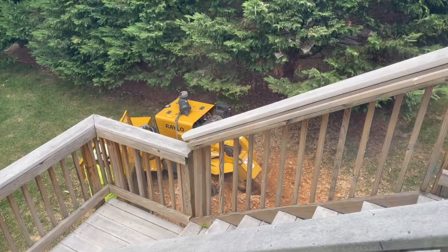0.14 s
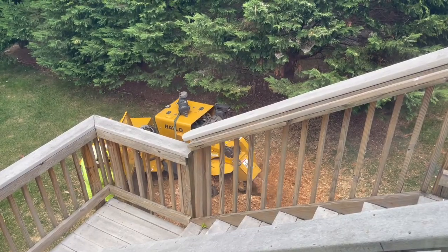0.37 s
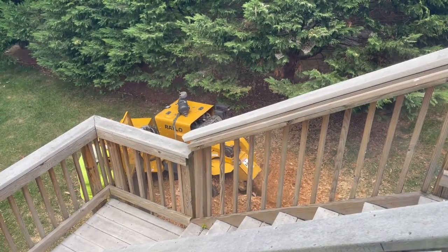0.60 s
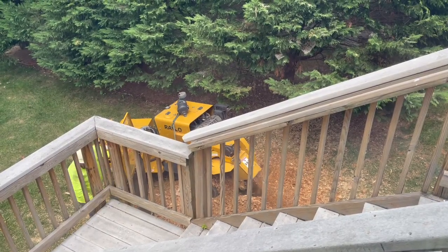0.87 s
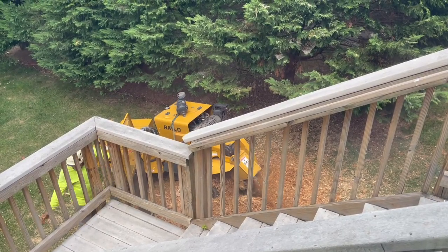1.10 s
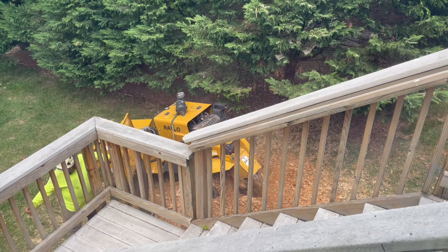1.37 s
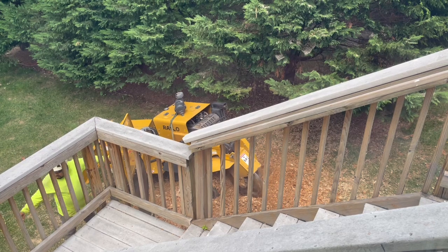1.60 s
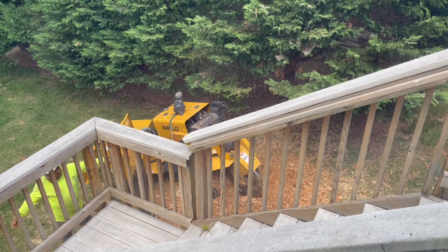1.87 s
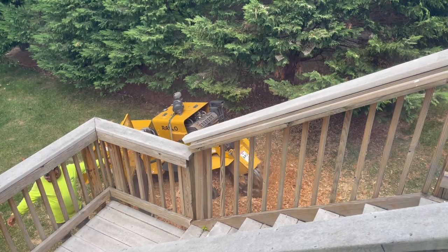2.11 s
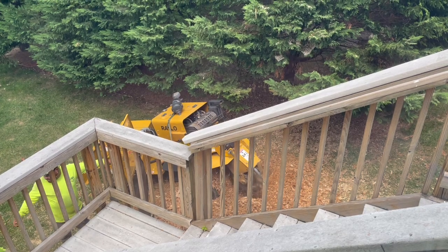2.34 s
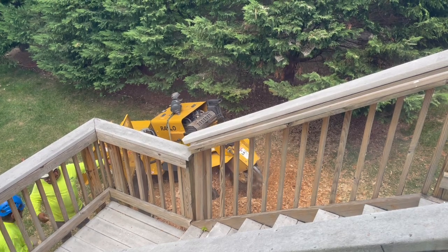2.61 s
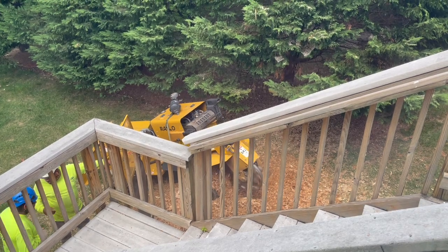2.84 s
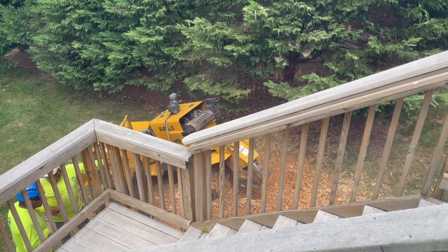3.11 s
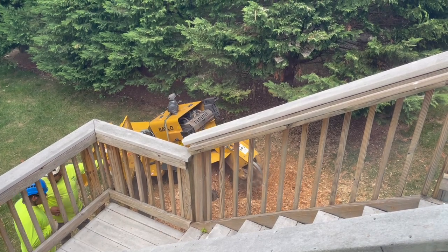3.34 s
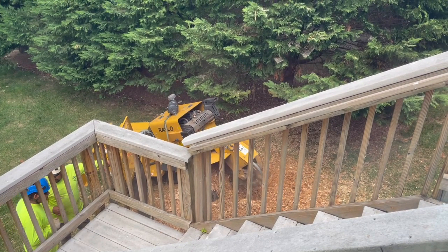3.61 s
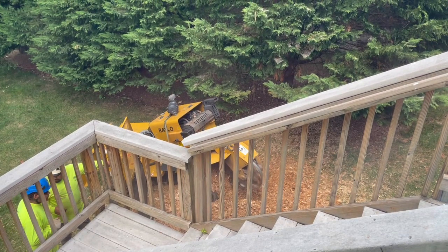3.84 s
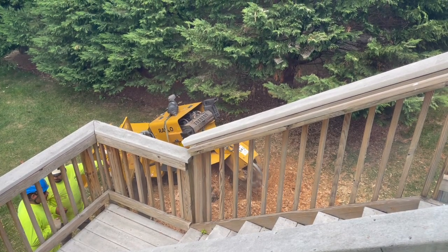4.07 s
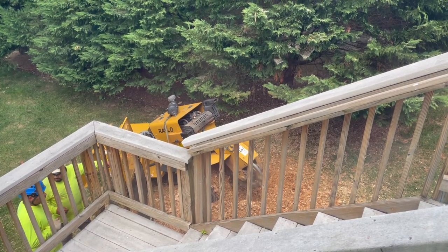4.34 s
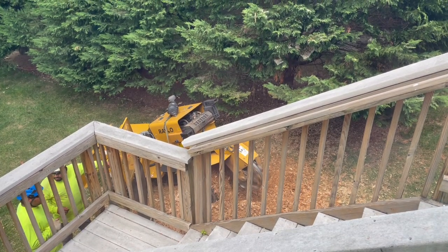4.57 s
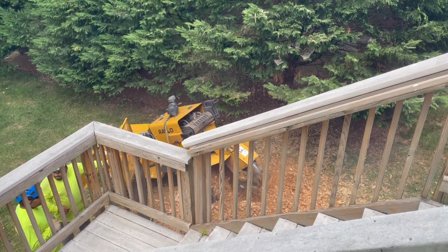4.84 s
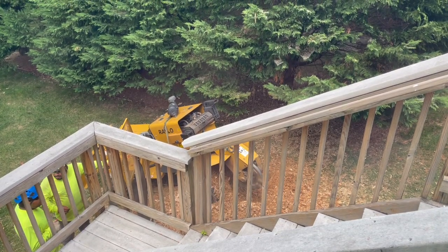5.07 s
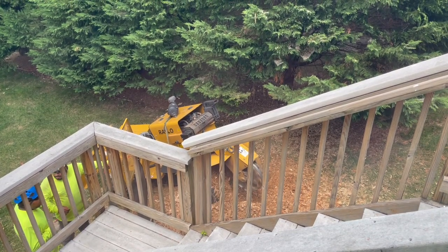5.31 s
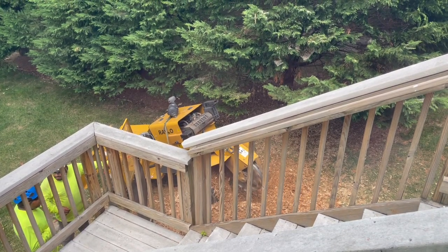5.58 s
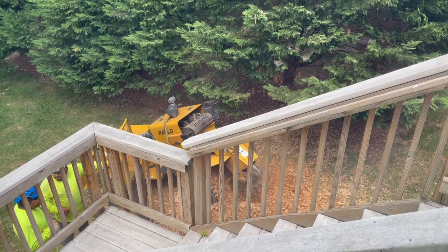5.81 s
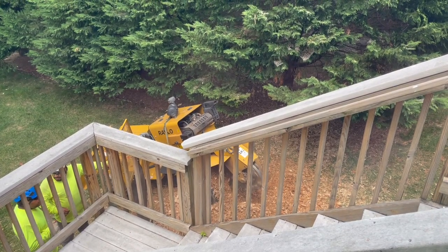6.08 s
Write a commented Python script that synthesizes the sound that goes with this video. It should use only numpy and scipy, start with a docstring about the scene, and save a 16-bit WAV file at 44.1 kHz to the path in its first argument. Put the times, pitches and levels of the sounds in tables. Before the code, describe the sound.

Outdoors, a stump grinder's engine drones and clatters, rising then settling, with dull wood knocks and a sudden close snap at three seconds.

```python
"""Stump grinder coming off load

A small twin-cylinder petrol engine drives a stump grinder in a garden below a wooden deck.
It comes off load, overshoots and settles at a steady speed: a boom, crank tones and metal clatter.
The wheel grazes wood now and then, as random knocks that ring the stump and the wheel guard.
After a faint tick a thrown chip cracks against the woodwork close by: resonances with dense echoes."""
import sys
import numpy as np
from scipy import signal
from scipy.fft import rfft, irfft
from scipy.io import wavfile

SR = 44100
rng = np.random.default_rng(int(sys.argv[2]) if len(sys.argv) > 2 else 0)


def convert_level_to_amplitude(level_db):
    """Map a level in decibels to its linear amplitude factor."""
    exponent = np.asarray(level_db, float) / 20
    return 10 ** exponent


def bounce(signal):
    """Save signal as a 16-bit WAV file at the path given by the first command-line argument."""
    frames = np.transpose(np.atleast_2d(signal))
    limited = np.clip(frames, -1, 1)
    pcm = np.round(limited * 32767).astype(np.int16)
    wavfile.write(sys.argv[1], SR, pcm)


N = 272979  # length in samples
T = np.arange(N) / SR  # time in seconds


def evened(x):
    """Scales to rms 1."""
    return x / np.sqrt(np.mean(abs(x) ** 2, -1, keepdims=True) + 1e-20)


def read(points, hz, column=1):
    """Reads a table column along a log frequency axis."""
    rows = np.array(points)
    return np.interp(np.log(hz + 1), np.log(rows[:, 0] + 1), rows[:, column])


def over_time(points):
    """Draws straight lines between the rows of a table that starts with seconds; one curve a column."""
    s, *columns = np.transpose(points)
    return [np.interp(T, s, column) for column in columns]


def lowpass(x, hz, order, rate=SR):
    """Takes off the treble above hz."""
    return signal.lfilter(*signal.butter(N=order, Wn=hz, fs=rate), x)


def noise():
    """Two unrelated channels of white noise."""
    return rng.standard_normal((2, N))


def coloured(x, points):
    """Filters by a spectrum in dB."""
    hz = np.fft.rfftfreq(x.shape[-1], 1 / SR)
    return irfft(rfft(x) * convert_level_to_amplitude(read(points, hz)), x.shape[-1])


def resonate(x, hz, width):
    """A two-pole resonance of gain 1, passed twice for steep skirts."""
    b, a = signal.iirpeak(hz, hz / width, SR)
    return signal.lfilter(b, a, signal.lfilter(b, a, x))


def body(x, modes):
    """The sum of a body's resonances at their own relative levels, scaled to rms 1."""
    return evened(sum(convert_level_to_amplitude(db) * evened(resonate(x, hz, width)) for hz, width, db in modes))


def drift(hz):
    """Two slow complex random curves of rms 1, moving up to about hz times a second."""
    slow = rng.standard_normal((2, N // 128 + 2, 2)) @ [1, 1j]
    slow = evened(lowpass(slow, hz, order=2, rate=SR / 128))
    return np.array([np.interp(np.arange(N) / 128, np.arange(len(row)), row) for row in slow])


def blows(per_s, spread_db):
    """Uneven knocks of either sign; a few are hard."""
    hardness = np.minimum(rng.exponential(1, (2, N)), 4)
    size = convert_level_to_amplitude(spread_db * hardness) * rng.choice([-1, 1], (2, N))
    return size * (rng.random((2, N)) < per_s / SR)


def swells(rows, floor_db):
    """Smooth humps of level over a floor; each row: middle in seconds, level in dB, length in seconds."""
    humps = sum(convert_level_to_amplitude(db) ** 2 * np.exp(-(2 * (T - s) / length) ** 2) for s, db, length in rows)
    return np.sqrt(convert_level_to_amplitude(floor_db) ** 2 + humps)


def orders(table, turns, load, firm=0):
    """Tones at multiples of the crank speed that waver as cycles differ; firm steadies them under load."""
    out = 0
    for order, loaded_db, free_db, share, waver_hz in table:
        share = np.clip(share * (1 - firm * np.maximum(load, 0)), 0, 1)
        wavering = np.sqrt(1 - share ** 2) + share * drift(waver_hz)
        level = convert_level_to_amplitude(free_db + load * (loaded_db - free_db))
        start = rng.random()
        out += level * wavering * np.exp(2j * np.pi * (order * turns + start))
    return np.sqrt(2) * out.real


# How fast the engine fires. Each row: time in seconds, firing rate in Hz.
FIRING_SPEED = [(0, 97), (.15, 98), (.3, 100), (.45, 103), (.6, 106), (.9, 110), (1.1, 111.1), (1.3, 111.6),
                (1.5, 110.7), (1.95, 108.4), (2.15, 107.4), (2.45, 106.8), (3.6, 106.5), (4.3, 106.5),
                (4.6, 106.8), (6.19, 106.7)]


def engine_speed():
    """The firing rate, and the crank turns so far: a twin fires twice a crank turn."""
    firing_hz, = over_time(FIRING_SPEED)
    return firing_hz, np.cumsum(firing_hz / 2) / SR


def engine_load():
    """The load holds at 1, then eases away, with a slight extra push on the way down."""
    unload_s, ease_s = 0.45, 0.58
    push = 0.066 * np.exp(-((T - 1) / 0.13) ** 2)
    return np.exp(-np.maximum(T - unload_s, 0) / ease_s) * (1 + push)


def exhaust_boom(firing_hz, turns):
    """The silencer booms at the firing rate, most strongly near one rate, as a clean tone."""
    best_hz, best_db, floor_db = 107.1, -26.5, -39
    rise_db_per_hz, fall_db_per_hz = 3, 0.9  # below and above the best rate
    off_hz = firing_hz - best_hz
    boom_db = best_db + np.minimum(rise_db_per_hz * off_hz, -fall_db_per_hz * off_hz)
    boom_db = np.maximum(boom_db, floor_db) + 0.48 * drift(2.0)[0].real
    boom = convert_level_to_amplitude(boom_db) * np.exp(4j * np.pi * turns) * (1 + 0.091 * drift(9.9))
    return np.sqrt(2) * boom.real


# Exhaust bark, muffled while the engine labours and hardest as it runs up.
# Each row: time in seconds, share of full bark (1 is full, 0 is free, below 0 is softer still).
BARK = [(0, -0.87), (.35, -0.6), (.55, 0.43), (.85, 0.41), (1.05, -0.089), (1.3, -1.4), (1.7, -0.33),
        (6.19, 0.11)]
# Shaft tones beside the boom. Each row: multiple of crank speed, level at full bark in dB,
# level running free in dB, wavering share from 0 to 1, waver speed in Hz.
SHAFT_TONES = [(1, -46, -48, .3, 5), (2.5, -52, -54, .5, 4), (3, -41, -49, .6, 5), (4, -35, -38.5, .55, 5),
               (5, -39, -45, .7, 4), (6, -35, -39, .65, 5), (8, -51, -58.5, .75, 5), (11, -54, -62, .7, 5),
               (13, -60, -65, .7, 5)]


def shaft(turns):
    """Tones at multiples of the crank speed that waver less the harder the exhaust barks."""
    bark, = over_time(BARK)
    return orders(SHAFT_TONES, turns, bark, firm=0.88)


# Valve gear tones. Each row: multiple of crank speed, level at full load in dB,
# level running free in dB, wavering share from 0 to 1, waver speed in Hz.
VALVE_TONES = [(15.5, -70, -70, .6, 5), (16, -66, -65, .6, 4), (18, -66, -68, .6, 4),
               (19.5, -72, -69, .6, 5), (20, -64, -68, .6, 4), (22, -72, -72, .6, 4), (26, -72, -71, .6, 4),
               (32, -74, -73, .6, 5), (39, -90, -70, .8, 8)]


def valve_gear(turns, load):
    """Faint higher crank tones that follow the load."""
    return orders(VALVE_TONES, turns, load)


# Engine tones that come and go. Each row: multiple of crank speed, middle in seconds,
# level in dB, length in seconds.
SINGING_TONES = [(1, 1.6, -48, 1.3), (4, 1.3, -38, .5), (5, 1.9, -41, 1.1), (20, 1.25, -63, .6),
                 (34, 2.8, -66, 1.4), (34, 4.1, -64, .5), (34, 4.95, -60.5, 1.2)]


def singing(turns):
    """Single crank tones, each swelling up once and fading again."""
    tones = 0
    for order, *hump in SINGING_TONES:
        tones += swells([hump], floor_db=-80) * orders([(order, 0, 0, .45, 7)], turns, 0)
    return tones


# Hydraulic pump, fourteen pulses a crank turn. Each row: multiple of crank speed,
# level at full effort in dB, level idle in dB, wavering share from 0 to 1, waver speed in Hz.
PUMP_TONES = [(14, -50, -63.5, .8, 11), (28, -61, -71, .72, 9), (42, -56.5, -74, .9, 20),
              (56, -67, -84, .95, 28), (70, -62, -80, .93, 24), (84, -67, -88, .96, 30)]


def pump(turns):
    """Pump pulses whose effort holds, eases away, and works once more, briefly."""
    stop_s, ease_s = .55, .2
    nudge = .68 * np.exp(-((T - 1.08) / .26) ** 2)
    effort = np.exp(-np.maximum(T - stop_s, 0) / ease_s) + nudge
    return orders(PUMP_TONES, turns, effort)


# The fine whine beside the cowl ring. Each row: multiple of crank speed, level when faint in dB,
# level when strong in dB, wavering share from 0 to 1, waver speed in Hz.
WHINE_TONE = [(40, -74, -65, .8, 8)]
# The cowl's ring. Each row: time in seconds, pitch in Hz, level in dB, blur from 0 to 1.
COWL_RING = [(0, 1954, -56.5, 1), (.6, 2071, -80.5, 0.7), (1.1, 2057, -59, 0.1), (1.5, 2053, -58.5, 0.8),
             (2.1, 2050, -60, 0.6), (2.601, 2091, -70, 0.9), (3.401, 2121, -61, 0.7), (3.75, 2088, -61, .3),
             (4.15, 2095, -57, 0.4), (4.3, 2127, -61, 0.9), (4.6, 2101, -59.5, 0.8), (5.1, 2140, -60, 0.9),
             (5.3, 2130, -60.5, 0.9), (5.7, 2125, -58, 0.8), (5.9, 2095, -60, 0.6), (6.19, 2080, -58.5, 1)]


def whine(turns, load):
    """A fine crank tone that swells with the cowl ring and comes in as the load goes."""
    strong_db, range_db = -61, 3.5
    _, ring_db, _ = over_time(COWL_RING)
    faintness = np.clip((strong_db - ring_db) / range_db, 0, 1)
    return orders(WHINE_TONE, turns, faintness) * (1 - load) ** 4


def cowl_ring():
    """One wandering tone from the cowl; blur trades slow wavering for fast."""
    ring_hz, ring_db, blur = over_time(COWL_RING)
    blur = np.clip(blur, 0, 1)
    wavering = np.sqrt(1 - blur ** 2) * drift(8) + blur * drift(40)
    tone = wavering * np.exp(2j * np.pi * np.cumsum(ring_hz) / SR)
    return convert_level_to_amplitude(ring_db) * np.sqrt(2) * tone.real


# Spectrum of valve gear, belts and cooling air. Each row: frequency in Hz, relative level in dB per Hz.
CLATTER_SPECTRUM = [(210, -44.5), (350, -3), (430, -6), (530, -8.5), (630, -9.5), (800, -11.5),
                    (1070, -16.5), (1760, -21), (2150, -20), (2520, -27), (3860, -28), (5200, -35.5),
                    (5600, -40.5), (6500, -39.5), (7600, -46), (9000, -43.5), (12000, -78)]
# Sheet metal of the cowl. Each row: frequency in Hz, width in Hz, level running free in dB.
COWL_MODES = [(438.4, 60, -59.5), (477.4, 6.8, -66.5), (593.2, 57, -62), (664, 120, -62.5), (707, 34, -63),
              (734.3, 35, -62.5), (778, 45, -63.5), (1290, 1000, -75), (2312, 79, -75), (2740, 35, -79.5),
              (3033, 24, -76.5), (4254, 66, -76)]


def clatter(turns, load):
    """Dense metal ticks and air noise, pulsing a little with each firing, ring the cowl."""
    pulse = 1 + .06 * np.cos(4 * np.pi * turns) + .09 * np.cos(2 * np.pi * turns) + .08 * drift(25).real
    # the same ticks come back every two turns
    place = (turns / 2 % 1 * 1024).astype(int)
    cycle = rng.standard_normal((2, 1024))[:, place]
    repeats = lowpass(cycle, 2600, order=2)
    ticks = evened(blows(2500, 3.0))
    drive = pulse * (noise() + 0.33 * ticks) + 0.54 * repeats
    rings = sum(convert_level_to_amplitude(db + 8.3 * load) * evened(resonate(drive, hz, width)) for hz, width, db in COWL_MODES)
    hiss = evened(coloured(drive, CLATTER_SPECTRUM))
    dull = lowpass(hiss, 1300, order=1)
    # load lifts the low part most, and makes it surge unevenly
    dull_db = -48 + (9 + 2.5 * drift(14)[0].real) * load
    bright_db = -42 + 3.7 * load
    return convert_level_to_amplitude(dull_db) * dull + convert_level_to_amplitude(bright_db) * (hiss - dull) + rings


# The wheel bites wood. Each row: middle in seconds, thud level in dB, length in seconds.
BITES = [(.01, -23, 0.052), (.2, -30.5, 0.13), (.42, -35, 0.2), (.75, -30.5, 0.26), (1.69, -25.5, 0.061),
         (1.89, -27.5, 0.18), (2.0, -28, 0.082), (2.17, -29.5, 0.12), (2.62, -42, 0.22), (3.12, -32, 0.094),
         (3.89, -30, 0.13), (4.5, -37.5, 0.14), (4.96, -42, 0.11), (5.26, -29.5, 0.11), (5.6, -39, 0.12)]
# Stump and wheel guard. Each row: frequency in Hz, width in Hz, relative level in dB.
GROUND_MODES = [(66, 57, -15), (149.6, 32, -10), (163.6, 13.3, -4), (181.3, 19.1, -2), (211, 43.5, -5.5)]


def wheel_bites():
    """Uneven knocks ring the stump and wheel guard, softly between bites."""
    return swells(BITES, floor_db=-40) * body(blows(260, 1.5), GROUND_MODES)


# The frame shudders. Each row: middle in seconds, level in dB, length in seconds.
SHUDDERS = [(.14, -36, 0.06), (.6, -29, 0.19)]
# Steel frame. Each row: frequency in Hz, width in Hz, relative level in dB.
FRAME_MODES = [(234.6, 21.4, -4.5), (269.8, 25.3, -1.5), (315.7, 22, -2), (332.4, 6.4, -10),
               (265, 580, -19)]


def frame_shake(load):
    """Knocks ring the steel frame in uneven throbs, a little harder under load."""
    floor_db = -38.5 + 3 * load + 3 * drift(4.2)[0].real
    floor_db = floor_db + 2
    return swells(SHUDDERS, floor_db) * body(blows(400, 1.2), FRAME_MODES)


# The thrown chip's hits. Each row: time in seconds, peak level in dB.
CHIP_HITS = [(2.9443, -42.5), (3.017, -14.5)]
# The struck board. Each row: frequency in Hz, width in Hz, level in dB.
BOARD_MODES = [(580, 180, 0), (735, 110, 3), (960, 150, 0), (1120, 150, -1), (1350, 220, 0),
               (1650, 260, -2), (2150, 480, -1), (3000, 1000, -1), (3820, 800, -9), (4500, 1200, -11),
               (5300, 700, -19), (8200, 1500, -38), (12500, 4200, -34)]
# Echoes from rails, walls and garden. Each row: level in dB, seconds to fall by 60 dB.
ECHOES = [(-16.5, .04), (-24, .21), (-32, .6)]


def chips():
    """A chip snaps on a board; rails and walls send back dense copies, partly different at each ear."""
    t = np.arange(SR // 4) / SR
    kept = (rng.random((2, len(t))) < .3) * (t > .0012)
    copies = rng.standard_normal((2, len(t))) * kept
    copies[1] = .25 * copies[0] + .95 * copies[1]
    paths = copies * sum(convert_level_to_amplitude(db - 60 * t / t60) for db, t60 in ECHOES)
    dull = lowpass(paths, 1900, order=1)
    paths = dull + (paths - dull) * convert_level_to_amplitude(-60 * t / .18)  # treble dies first
    paths[:, 0] = convert_level_to_amplitude([1.5, -2.5])  # the direct snap, left and right
    crack = 0
    for k, (hz, width, db) in enumerate(BOARD_MODES):
        crack += (-1) ** k * convert_level_to_amplitude(db) * resonate(paths, hz, width)
    crack = crack / abs(crack[0, :40]).max()
    out = np.zeros((2, N))
    for s, db in CHIP_HITS:
        out[:, round(s * SR):][:, :len(t)] += convert_level_to_amplitude(db) * crack
    return out


# Tracks and ground. Each row: frequency in Hz, width in Hz, relative level in dB.
RUMBLE_MODES = [(27, 16, -17.5), (68.2, 11, -2.5), (92.9, 13, -4), (120, 43, -1.5)]


def rumble(load):
    """Noise shakes the tracks and the ground, 10 dB stronger at full load."""
    return convert_level_to_amplitude(-50.5 + 10 * load) * body(noise(), RUMBLE_MODES)


# Spectrum of a faint hiss near by. Each row: frequency in Hz, relative level in dB per Hz.
AIR_SPECTRUM = [(7000, -32.5), (8000, 0), (9500, -9), (10700, 6), (13800, 3.5), (15500, -16.5)]


def air():
    """A faint, steady, high hiss of filtered noise."""
    return convert_level_to_amplitude(-83) * evened(coloured(noise(), AIR_SPECTRUM))


# Microphone pair. Each row: frequency in Hz, likeness of the two sides from 0 to 1,
# radians by which left leads, left over right in dB.
MICROPHONES = [(50, .99, 0, 2.2), (107, .99, .25, 3.2), (180, .96, .1, 2.5), (340, .8, .2, 3.4),
               (600, .45, -.5, 4), (1030, .45, -1.9, 3.6), (1550, .5, -2.6, 3.2), (1810, .5, .2, 3),
               (2500, .65, .8, 3), (4400, .5, .6, 2.5), (6000, .4, 1.5, 1.5), (8000, .7, 2.7, .5),
               (10300, .995, 0, .5)]


def microphone_pair(rough, tones):
    """Blends two unrelated hearings into left and right, as alike at each frequency as the table says."""
    a, b = rfft(rough)
    tone_a, tone_b = rfft(tones)
    hz = np.fft.rfftfreq(N, 1 / SR)
    same, lead, tilt_db = (read(MICROPHONES, hz, column=k) for k in (1, 2, 3))
    same = np.clip(same, 0, 1)
    unlike = np.sqrt(1 - same ** 2)
    right = (same * a + unlike * b) * np.exp(-1j * lead)
    # steady tones reach both sides alike; only their wavering differs
    right_tones = tone_a + unlike * 1.4 * (tone_b - tone_a)
    right += right_tones * np.exp(-1j * np.clip(lead, -.35, .35))
    return irfft([(a + tone_a) * convert_level_to_amplitude(tilt_db / 2), right * convert_level_to_amplitude(-tilt_db / 2)], N)


def scene():
    """The machine's tones and rough sounds in the microphone pair, plus the chip close by."""
    firing_hz, turns = engine_speed()
    load = engine_load()
    tones = exhaust_boom(firing_hz, turns) + shaft(turns) + valve_gear(turns, load)
    tones = tones + singing(turns) + pump(turns) + whine(turns, load)
    kick = 1 + .22 * np.cos(2 * np.pi * turns)  # the frame kicks at each crank turn
    knocks = (wheel_bites() + frame_shake(load)) * kick
    rough = clatter(turns, load) + cowl_ring() + knocks + rumble(load) + air()
    return microphone_pair(rough, tones) + chips()


def top_cut(x):
    """Nothing passes above the cut-off."""
    return signal.sosfilt(signal.butter(12, 15800, fs=SR, output="sos"), x)


def record(dry):
    """The microphone drops the deepest bass, below 40 Hz."""
    highpass = signal.butter(N=3, Wn=40, btype="high", fs=SR, output="sos")
    mix = signal.sosfilt(highpass, dry)
    return top_cut(mix)


dry = scene()
out = record(dry)
bounce(out)
```